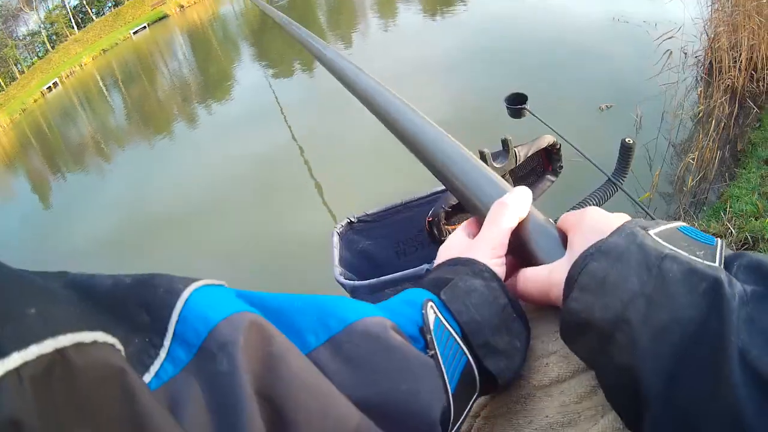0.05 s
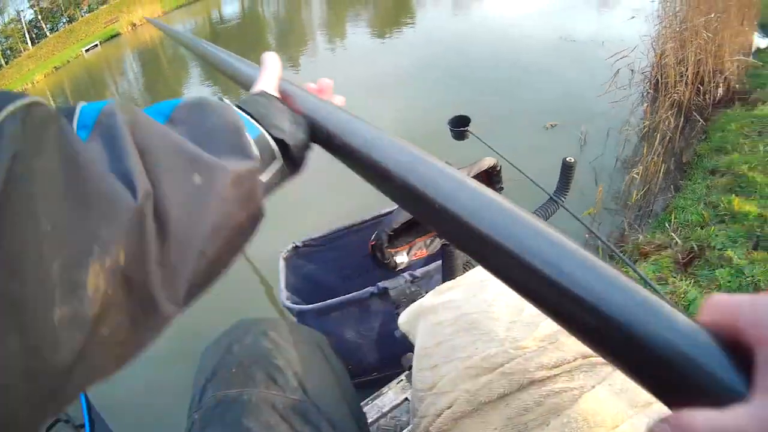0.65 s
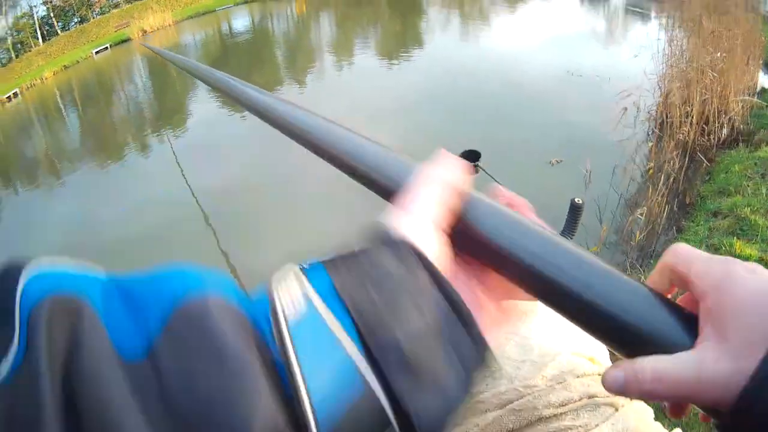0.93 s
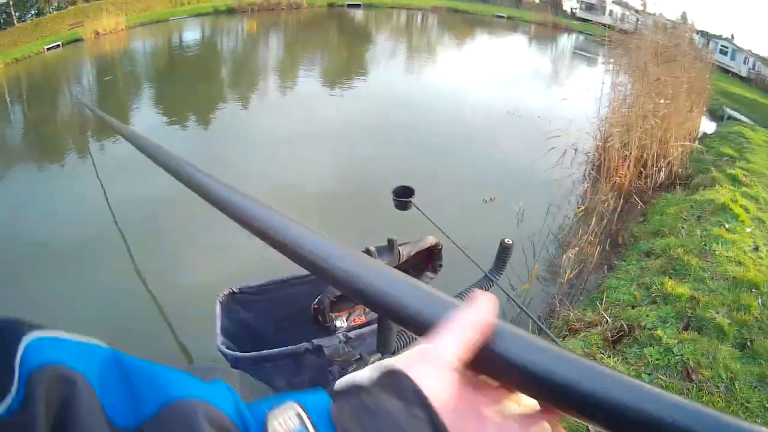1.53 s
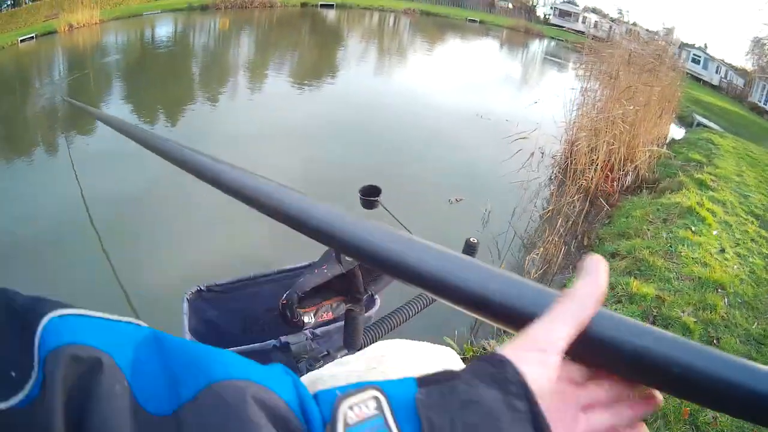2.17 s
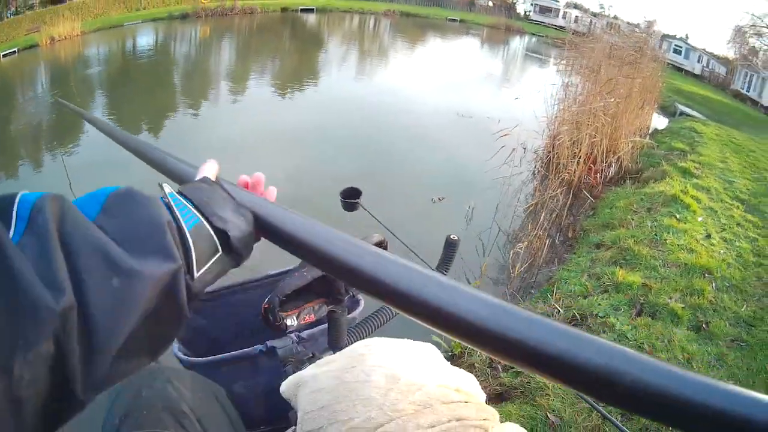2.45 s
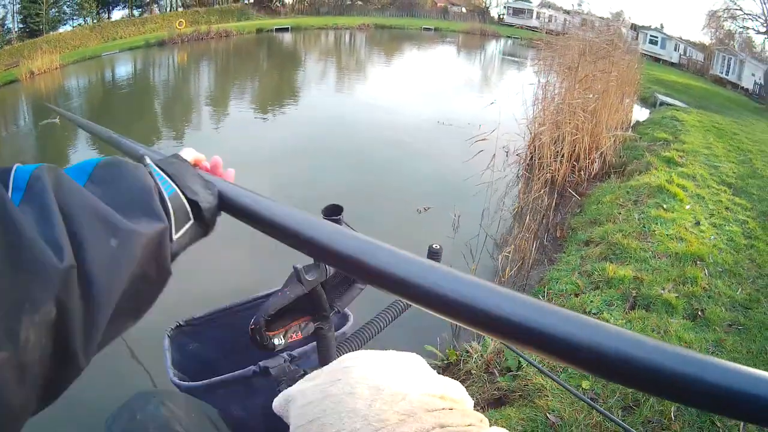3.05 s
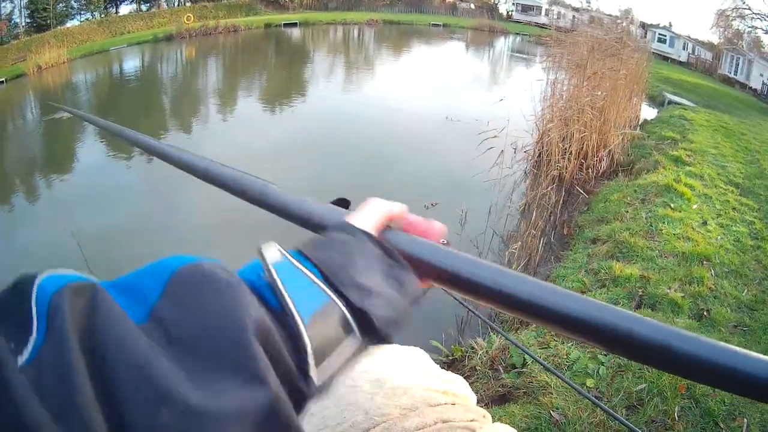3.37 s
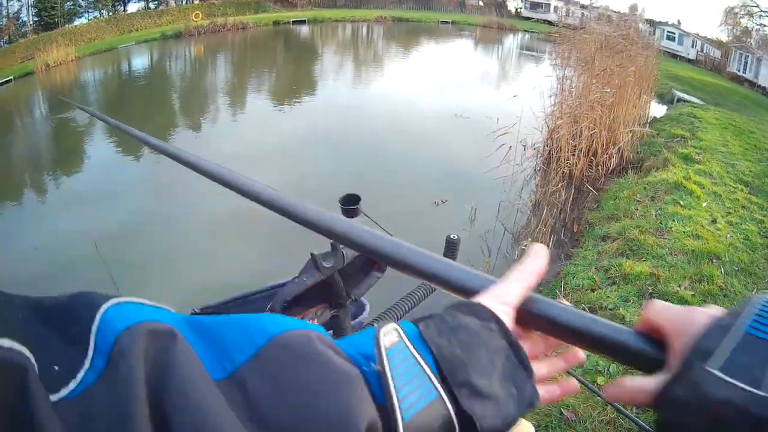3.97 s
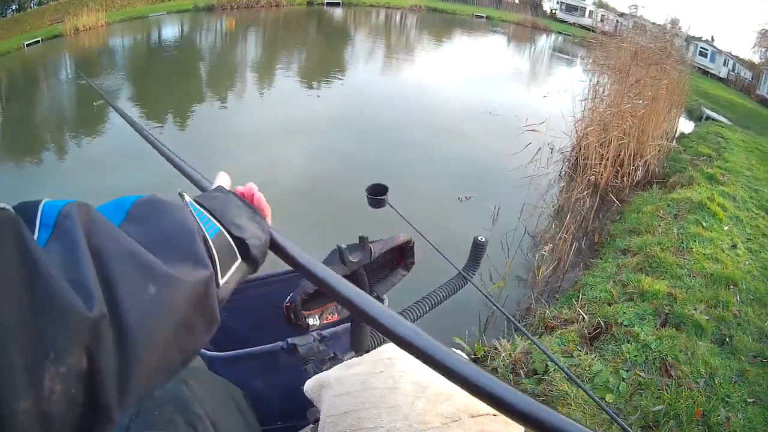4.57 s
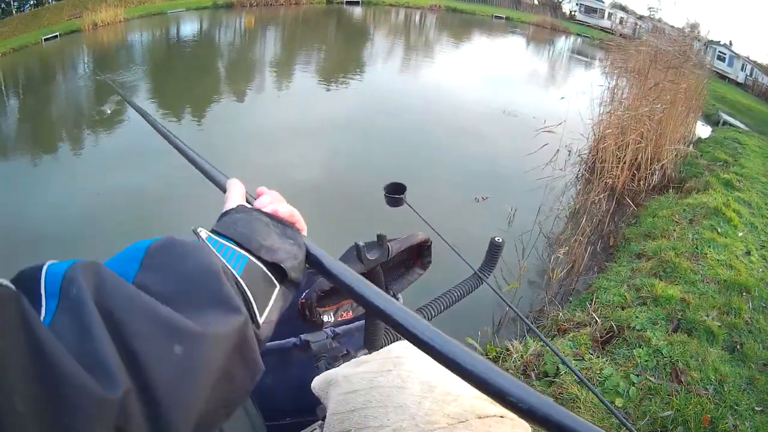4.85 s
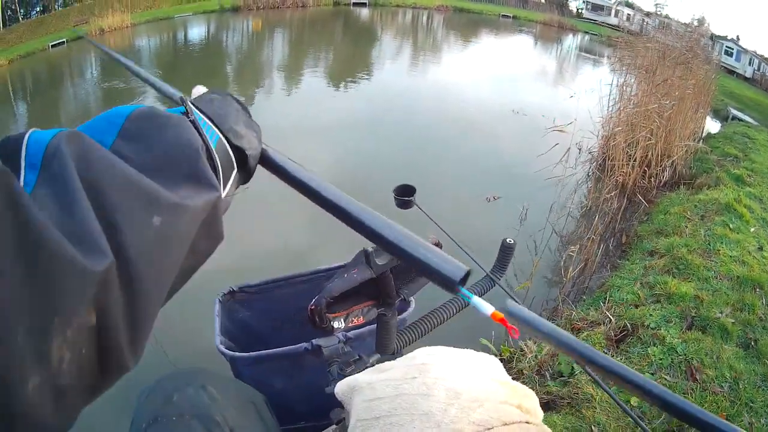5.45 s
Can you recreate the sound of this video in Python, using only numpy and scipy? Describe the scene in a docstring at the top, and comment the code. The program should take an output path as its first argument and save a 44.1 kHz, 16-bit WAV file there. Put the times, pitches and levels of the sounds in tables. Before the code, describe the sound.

A fishing pole is drawn back through the hands, rubbing against a nylon jacket sleeve. The cloth drags and pops softly at first, then rasps in a run of quick, hissy strokes with a zip that rises and falls in pitch. Hands pat and tap the tube between pulls. The rubbing softens to a whisper and ends with a faint click. It is all close to the microphone, outdoors in a light breeze.

```python
"""A long carbon fishing pole is drawn back through the hands, close by, beside a still lake.
First, over quiet air and a light breeze, a jacket sleeve drags on the pole and its creases pop.
From about 1 s the arm reaches and pulls in turn: friction makes the sleeve rasp, and its ribs zip
at a pitch proportional to the arm's speed, while hands pat the tube and fingers tap it.
After 4.5 s the strokes are over; a narrow whisper swells in the last rubbing, and a joint clicks."""
import sys
import numpy as np
from scipy.fft import rfft, irfft, next_fast_len
from scipy.io import wavfile
from scipy.ndimage import uniform_filter1d, map_coordinates

SR = 44100
rng = np.random.default_rng(int(sys.argv[2]) if len(sys.argv) > 2 else 0)


def store_pcm(level_fs):
    """Save levels as 16-bit WAV."""
    pcm = np.round(np.clip(level_fs, -1, 1) * 32767).astype(np.int16)
    wavfile.write(sys.argv[1], SR, np.atleast_2d(pcm).T)


N = 247573

# Arm strokes. Each row: fastest moment, rise and fall in seconds, top rib rate in Hz, roundness of
# the speed arch (1 pointed, 2 parabolic), share of speed lost by lift-off, fizz, hiss and rasp in dB,
# lean (gain from mid-stroke to end) in dB, zip and overtones in dB, relative spread of slip speeds.
ARM_STROKES = [ (.98, .172, .074, 2288, 1.4, .72, -32.5, -32.5, -33.5, 3.5, -32, -43.5, 0.05),
               (1.24, 0.2, .158, 2944, 1.73, 0.77, -28, -31.5, -38, -1, -38.5, -57, 0),
               (1.567, 0.21, .09, 3153, 1.4, 0.74, -44, -45, -51, 4, -53.5, -52, 0),
               (1.792, 0.15, .168, 2955, 2.6, .78, -26, -31.5, -39.5, 0.5, -41.5, -34, 0.02),
               (2.101, 0.22, .125, 3508, 1.07, 0.79, -49, -51.5, -54.5, -1.5, -51, -54, 0.06),
               (2.311, 0.087, .18, 3099, 1.5, .76, -28, -32, -41, -1, -38, -38, 0.02),
               (2.642, 0.21, .115, 2956, 1.6, 0.77, -55, -52, -54, 6, -52.5, -52, 0.01),
               (2.875, 0.12, .207, 2210, 2.0, .72, -28.5, -36, -43.5, 5, -42, -37.5, 0.04),
               (3.271, .175, .09, 2093, 1.39, .7, -57, -60, -58, 5, -56, -52.5, .012),
               (3.514, 0.15, .143, 2625, 1.45, 0.68, -36, -39.5, -45, -2.5, -48.5, -54, 0.02),
               (3.88, 0.22, 0.091, 3508, 1.03, .18, -49, -55.5, -60, 0.5, -52, -49, 0.05),
               (4.34, .135, 0.25, 1707, 2.0, .4, -38, -44.5, -55, -1, -75, -46.5, 0.04)]
# Swells of unpitched cloth rubbing, alone or on top of a stroke.
# Each row: firmest moment, rise and fall in seconds, fizz, hiss and rasp in dB.
RUB_SWELLS = [(.43, 0.18, 0.16, -54, -57.5, -55.5), (0.652, 0.2058, 0.14, -37.5, -41.5, -39.5),
              (2.179, 0.108, 0.11, -47, -42.5, -44), (3.11, 0.056, 0.027, -41.5, -51, -45),
              (4.172, 0.36, 0.18, -45.5, -48, -48.5), (4.371, .11, .1, -39, -40, -44),
              (4.67, .17, .1, -46.5, -49.5, -50), (5.245, 0.15, 0.05, -56.5, -62.5, -61)]
# Short pops and knocks. Each row: start in seconds, relative level in dB, pitch in Hz.
SHORT_POPS = [(0.57, -24.5, 660), (0.609, -24, 1140), (0.625, -18.5, 750), (0.725, -27, 1030),
              (0.768, -31, 1290), (0.83, -30, 405), (0.919, -18, 700), (1.267, -28, 502),
              (1.272, -14.5, 430), (1.288, -25, 506), (1.304, -35, 348), (2.297, -29.5, 977),
              (2.348, -32, 1027), (2.7, -36.5, 306), (2.933, -22.5, 861), (3.152, -38, 504.6),
              (3.522, -27.5, 812), (3.561, -32, 930), (3.964, -41.5, 321), (3.983, -34.5, 412),
              (4.01, -32, 710), (4.034, -38.5, 483), (4.516, -36, 252), (5.256, -40, 1590)]
# Ringing ticks of the tube: finger taps, and last a joint clicking.
# Each row: start in seconds, relative level in dB, ring frequency in Hz.
TUBE_TICKS = [(1.506, -42.5, 1645), (1.614, -38, 1960), (1.713, -32.5, 1480), (1.744, -32.5, 1450),
              (1.98, -40.5, 1310), (4.057, -42.5, 1205), (4.158, -49, 1230), (4.176, -49.5, 1120),
              (5.258, -46.5, 2434)]
# Tube wall modes. Each row: multiple of the ring frequency, relative level in dB, T60 in seconds.
WALL_MODES = [(0.999, 6, 0.064), (1.42, -6, 0.035), (2.7, -7, 0.021), (4, -15.5, .04)]
# Bunching cloth and new grips. Each row: middle and half length in seconds, crumple and scuff in dB.
HAND_GRIPS = [(0.403, .06, -50.5, -50), (0.61, 0.14, -51.5, -42), (0.837, 0.039, -45.5, -41.5),
              (0.976, 0.099, -45, -40), (1.284, 0.1, -44.5, -40.5), (1.409, 0.0202, -60, -43),
              (1.622, 0.031, -50, -45.5), (1.74, 0.19, -52.5, -50), (1.972, .03, -58, -46.5),
              (2.345, 0.038, -47, -42.5), (2.498, 0.0242, -59, -49.5), (2.754, 0.087, -53, -49),
              (3.542, 0.051, -54, -45.5), (4.018, 0.12, -51, -49), (4.186, 0.03, -61, -50),
              (4.515, 0.054, -53.5, -56), (4.9, 0.41, -62, -78)]
# A narrow whisper near 4 kHz. Each row: middle and half length in seconds, relative level in dB.
BAND_SWELLS = [(0.618, 0.11, -64.5), (1.42, 0.017, -48), (1.541, .03, -67), (4.079, .08, -62.5),
               (4.645, .08, -44.5), (5.089, .07, -61)]
# Strength of the breeze. Each row: time in seconds, relative level in dB.
BREEZE_LEVELS = [(0.0, -68), (0.87, -59.5), (1.05, -58), (1.16, -61), (2.97, -62), (3.48, -54.5),
                 (3.64, -61), (5.59, -66), (5.61, -56)]
# Noise spectra as heard, including the microphone's resonant peaks.
# Each row: frequency in Hz, relative spectral density in dB.
FIZZ_SPECTRUM = [(7000, -47), (9300, -14.5), (10400, -7.5), (11200, -1.5), (11750, 0), (12600, -6.5),
                 (14000, -6.5), (15000, -24), (15700, -9)]
HISS_SPECTRUM = [(3000, -43), (4400, -4.5), (4900, 0), (5900, -0.5), (6900, 3.5), (7700, -1), (9000, -6),
                 (10500, -7), (13000, -34)]
RASP_SPECTRUM = [(600, -16), (1000, -1.5), (1400, 2), (2000, -2), (2700, 1), (3250, -2.5), (3950, 7),
                 (4600, -4.5), (5600, -12), (8000, -42)]
KNOCK_SPECTRUM = [(250, -42), (550, 0), (1200, -0.5), (2200, 1.5), (3500, -14), (7000, -15), (14000, -38.5)]
CLOTH_SPECTRUM = [(60, -39.5), (130, -9.5), (280, 1.5), (480, 4), (700, -0.5), (1100, -13), (3000, -49)]
SCUFF_SPECTRUM = [(300, -23), (600, -9), (850, 2.5), (1250, -1), (1600, -2), (2600, -9.5), (6000, -67.5)]
BREEZE_SPECTRUM = [(15, -0.5), (35, -1.5), (75, -2.5), (130, -3.5), (300, -9.5), (800, -58)]
LAKE_SPECTRUM = [(59, -37), (100, -7), (149, -7.5), (205, -6.5), (776, -16.5), (959, -12.5), (1700, -21),
                 (1850, -17.5), (3330, -20.5), (10000, -23.5), (15600, -25)]

ONSET_DELAY_S = .003  # before each pop and tick sounds


def rubbing(rib_hz, moving, fizz_gain, hiss_gain, rasp_gain):
    """Sliding friction of nylon on the pole: three noise bands share one uneven contact pressure."""
    fine = friction(slips_per_s=5000, spread_db=3, slip_db=-10)
    fine = ribbed(fine, rib_hz, moving, likeness=.22, scatter=.035)
    medium = friction(slips_per_s=2500, spread_db=.5, slip_db=-7)
    medium = ribbed(medium, rib_hz, moving, likeness=.34, scatter=.025)
    coarse = friction(slips_per_s=1100, spread_db=-2.5, slip_db=-7.5)
    coarse = ribbed(coarse, rib_hz, moving, likeness=.49, scatter=.046)
    fizz = coloured(fine, FIZZ_SPECTRUM) * fizz_gain
    hiss = coloured(medium, HISS_SPECTRUM) * hiss_gain
    rasp = coloured(coarse, RASP_SPECTRUM) * rasp_gain
    pressure = amp(.847 * wobble(130) + 1.23 * wobble(27.97))
    return (fizz + hiss + rasp) * pressure


def friction(slips_per_s, spread_db, slip_db):
    """Stick-slip: countless tiny slips superpose into noise, and larger ones stand out as impulses."""
    slips = (rng.random(N) < slips_per_s / SR) * rng.standard_normal(N)
    slips *= amp(spread_db * np.clip(rng.standard_normal(N), -2, 2))
    return unit(rng.standard_normal(N) + amp(slip_db) * unit(slips))


def ribbed(noise, rib_hz, moving, likeness, scatter, ribs=3):
    """Comb filtering: each rib meets the same roughness one period later, so the bands glide."""
    combed = noise.copy()
    for k in range(1, ribs + 1):
        delay = k * SR / rib_hz * (1 + scatter * wobble(200))
        combed += moving * likeness ** k * map_coordinates(noise, [np.arange(N) - delay], order=3)
    return combed / np.sqrt(1 + moving * likeness ** 2)


def zipping(rib_hz, spread, zip_gain, overtone_gain, patches=3, harmonics=6, jitter=.032, rolloff_db=2):
    """Periodic plucking of the ribs gives a harmonic tone; each contact patch slips at its own pace."""
    fundamental, overtones = np.zeros((2, N))
    for _ in range(patches):
        patch_hz = rib_hz * (1 + spread * wobble(90) + jitter * wobble(1400))
        phase = 2 * np.pi * np.cumsum(patch_hz) / SR
        grip = amp(4.5 * wobble(150))  # the patch catches and lets go
        fundamental += grip * np.sin(phase)
        overtones += grip * sum(amp(-rolloff_db * (k - 2)) * np.sin(k * phase)
                                for k in range(2, harmonics + 1))
    fundamental = unit(fundamental * amp(1.3 * wobble(35)))
    overtones = unit(overtones * amp(1.3 * wobble(35)))
    return zip_gain * fundamental + overtone_gain * amp(2.5) * overtones


def arm_strokes(start_loss=.84, waver=.00706):
    """Rib rate is proportional to sliding speed, an arch in each stroke; faster is also brighter."""
    gains = np.zeros((5, N))  # fizz, hiss, rasp, zip, overtones
    db_per_doubling = np.array([8, 5, -2, 5.5, 5])[:, None]  # of speed, for each gain
    firmest, spread = np.zeros((2, N))
    rib_hz = np.full(N, float(ARM_STROKES[0][3]))
    for (fastest, rise, fall, top_hz, roundness, braking,
         fizz_db, hiss_db, rasp_db, lean_db, zip_db, overtones_db, slip_spread) in ARM_STROKES:
        progress, contact = gesture(fastest, rise, fall)
        touching = np.flatnonzero(contact)
        progress, contact = progress[touching], contact[touching]
        loss = np.where(progress < 0, start_loss, braking)
        speed = 1 - loss * np.abs(progress) ** roundness
        levels_db = np.array([fizz_db, hiss_db, rasp_db, zip_db, overtones_db])[:, None]
        stroke = contact * amp(levels_db + db_per_doubling * np.log2(speed) + lean_db * progress)
        stroke[3:] *= contact ** .64  # the ribs only sing under firm contact
        gains[:, touching] += stroke
        firmness = contact * amp(zip_db)
        leads = firmness > firmest[touching]  # at a turn, the firmer stroke sets the pitch
        rib_hz[touching[leads]] = top_hz * speed[leads]
        spread[touching[leads]] = slip_spread
        firmest[touching[leads]] = firmness[leads]
    moving = uniform_filter1d(1. * (firmest > 0), size=700)
    return rib_hz * (1 + waver * wobble(55)), spread, moving, gains


def rub_swells(sag_db=14.5, brush_db=-58):
    """Friction noise follows pressure: fizz, hiss and rasp gains swell over faint brushing."""
    gains = np.zeros((3, N))
    for firmest, rise, fall, *levels_db in RUB_SWELLS:
        progress, contact = gesture(firmest, rise, fall)
        gains += amp(levels_db)[:, None] * contact * amp(-sag_db * progress ** 2)
    return np.hypot(gains, amp(brush_db) * swell(middle_s=2.65, half_length_s=1.92))


def gesture(middle, rise, fall, settle_s=.095, lift_s=.035):
    """Kinematics of one movement: its progress (-1 to 1) and the cloth's contact (0 to 1)."""
    t = np.arange(N) / SR - middle
    contact = np.clip((t + rise) / settle_s, 0, 1) ** 1.4 * np.clip((fall - t) / lift_s, 0, 1)
    return np.interp(t, [-rise, 0, fall], [-1, 0, 1]), contact


def pops(swell_cycles=.54, snap_t60=.0066, crumple_t60=.061):
    """Impulses from a fold, a hand or a joint: a snap, a heavily damped swing and a brief crumple."""
    swings, snap_gain, crumple_gain = np.zeros((3, N))
    t = np.arange(SR // 10) / SR
    for start, db, hz in SHORT_POPS:
        onset = start + ONSET_DELAY_S
        age = hz * t / swell_cycles
        add(swings, onset, amp(db - 2.6) * np.sin(2 * np.pi * hz * t) * age * np.exp(1 - age))
        add(snap_gain, onset, amp(db - 8 - 60 * t / snap_t60))
        add(crumple_gain, onset, amp(db - 21 - 60 * t / crumple_t60))
    snaps = snap_gain * coloured(rng.standard_normal(N), RASP_SPECTRUM)
    crumples = crumple_gain * coloured(rng.standard_normal(N), CLOTH_SPECTRUM)
    return swings + snaps + crumples


def ticks(knock_t60=.046):
    """Modal ringing: a finger or joint excites the tube's wall modes, which the hand quickly damps."""
    rings, knock_gain = np.zeros((2, N))
    t = np.arange(SR // 6) / SR
    for start, db, hz in TUBE_TICKS:
        ring = np.zeros(len(t))
        for multiple, mode_db, t60 in WALL_MODES:
            decay = amp(mode_db + 2 * rng.standard_normal() - 60 * t / t60)
            ring += decay * np.sin(2 * np.pi * multiple * hz * t)
        add(rings, start + ONSET_DELAY_S, amp(db - 2) * ring)
        add(knock_gain, start + ONSET_DELAY_S, amp(db + 3 - 60 * t / knock_t60))
    return rings + knock_gain * coloured(rng.standard_normal(N), KNOCK_SPECTRUM)


def flexing(rasp_gain):
    """Small irregular slips: the jacket crumples and the palms scuff with each rub and new grip."""
    effort = rasp_gain ** .3597  # grows more slowly than the rasp
    crumple_gain, scuff_gain = amp(-40.5) * effort, amp(-41.5) * effort
    for middle, half_length, crumple_db, scuff_db in HAND_GRIPS:
        grip = swell(middle, half_length)
        crumple_gain = np.maximum(crumple_gain, amp(crumple_db) * grip)
        scuff_gain = np.maximum(scuff_gain, amp(scuff_db) * grip)
    crumple = coloured(friction(slips_per_s=160, spread_db=-1, slip_db=-2.5), CLOTH_SPECTRUM)
    crumple *= amp(.7 * wobble(29))
    scuff = coloured(friction(slips_per_s=700, spread_db=0, slip_db=-5), SCUFF_SPECTRUM)
    scuff = unit(scuff * amp(3 * wobble(45)))
    return crumple * crumple_gain + scuff * scuff_gain


def whisper(centre_hz=3950, width_hz=560):
    """Resonant filtering of noise: one narrow band swells during the rubbing."""
    level = sum(amp(db - 3) * swell(middle, half_length) for middle, half_length, db in BAND_SWELLS)
    band = filtered(rng.standard_normal(N), lambda hz: resonance(hz, centre_hz, width_hz) ** 2)
    return unit(band) * level


def lakeside(air_db=-60):
    """Pressure fluctuations of a breeze rumble on the microphone over the broad noise of open air."""
    breeze_db = np.interp(np.arange(N) / SR, *np.transpose(BREEZE_LEVELS))
    breeze = coloured(rng.standard_normal(N), BREEZE_SPECTRUM) * amp(breeze_db + 2 + .84 * wobble(21))
    return breeze + amp(air_db) * coloured(rng.standard_normal(N), LAKE_SPECTRUM)


def amp(db):
    """Amplitude ratio of a level in decibels."""
    return 10 ** (np.asarray(db) / 20)


def unit(x):
    """Normalisation to rms 1."""
    return x / np.sqrt(np.mean(x ** 2) + 1e-20)


def swell(middle_s, half_length_s):
    """A Gaussian envelope."""
    return np.exp(-((np.arange(N) / SR - middle_s) / half_length_s) ** 2)


def wobble(knots_per_s):
    """Smooth random modulation: a spline through random knots."""
    knots = rng.standard_normal(N // 8)
    return map_coordinates(knots, [np.arange(N) * knots_per_s / SR], order=2, mode="wrap")


def filtered(x, response):
    """Linear filtering: the spectrum of x times a frequency response."""
    size = next_fast_len(N + SR // 4)
    return irfft(rfft(x, size) * response(np.fft.rfftfreq(size, 1 / SR)), size)[:N]


def coloured(x, spectrum):
    """Spectral shaping by (Hz, dB) points joined on a log frequency axis, at rms 1."""
    points_hz, db = np.transpose(spectrum)
    return unit(filtered(x, lambda hz: amp(np.interp(np.log(hz + 1), np.log(points_hz + 1), db))))


def resonance(hz, centre, width):
    """Band-pass response of a damped oscillator."""
    return 1j * hz * width / (centre ** 2 - hz ** 2 + 1j * hz * width)


def add(track, start_s, sound):
    """Superposition of a sound on the track."""
    part = track[round(start_s * SR):][:len(sound)]
    part += sound[:len(part)]


def scene():
    """Free field: over open water the sources superpose with no echo."""
    rib_hz, spread, moving, gains = arm_strokes()
    fizz, hiss, rasp = np.hypot(gains[:3], rub_swells())  # strokes and swells add in power
    sleeve = rubbing(rib_hz, moving, fizz, hiss, rasp) + zipping(rib_hz, spread, *gains[3:])
    return (sleeve + whisper() + flexing(rasp) + pops() + ticks() + lakeside())[None]


def record(dry):
    """Band limiting: an ideal low-pass filter cuts at 15750 Hz."""
    return np.array([filtered(channel, lambda hz: hz < 15750) for channel in dry])


dry = scene()
out = record(dry)
store_pcm(out)
```